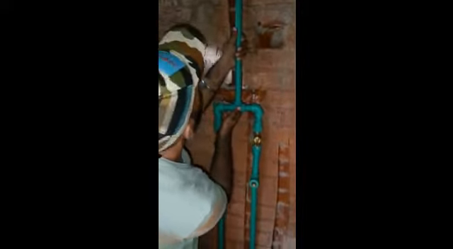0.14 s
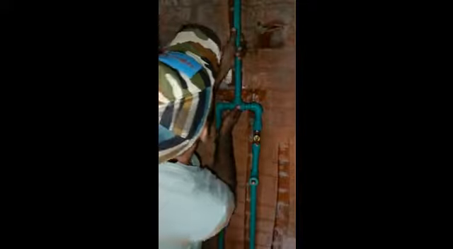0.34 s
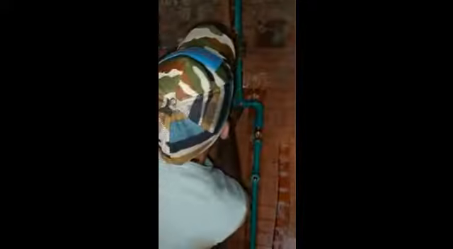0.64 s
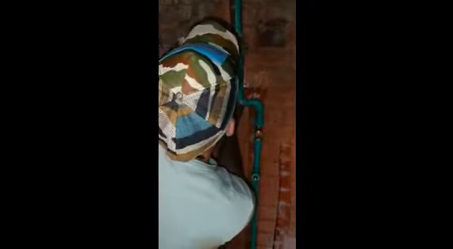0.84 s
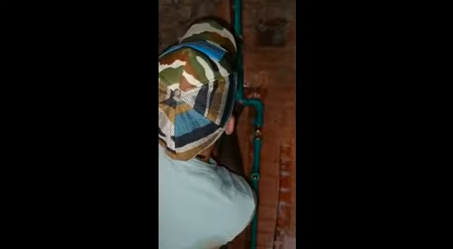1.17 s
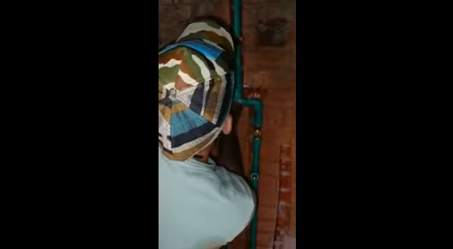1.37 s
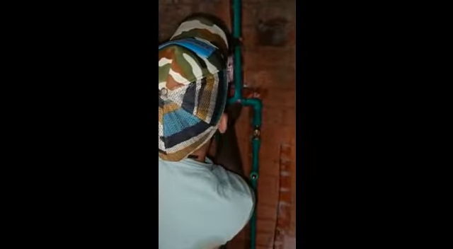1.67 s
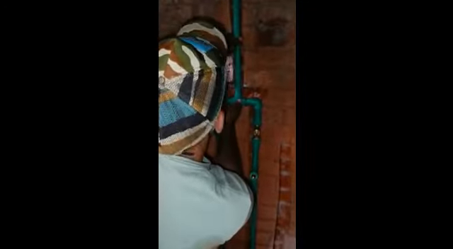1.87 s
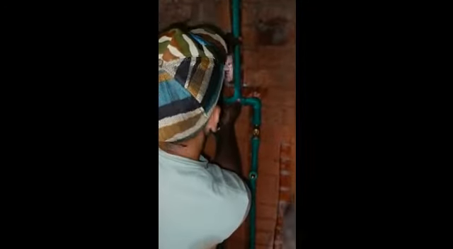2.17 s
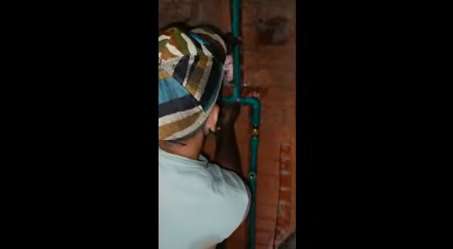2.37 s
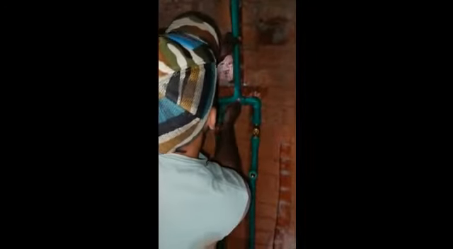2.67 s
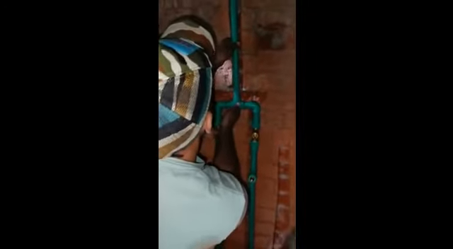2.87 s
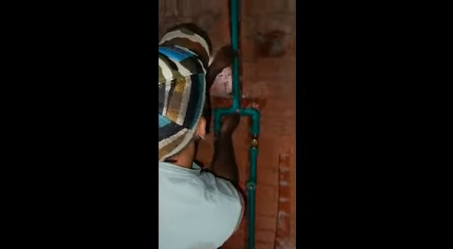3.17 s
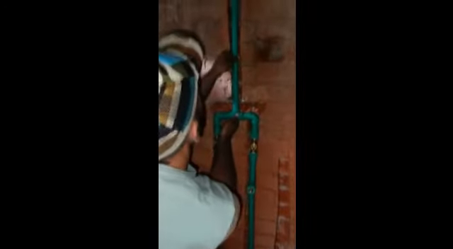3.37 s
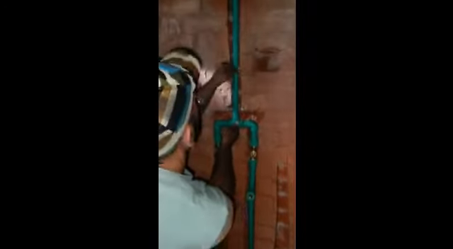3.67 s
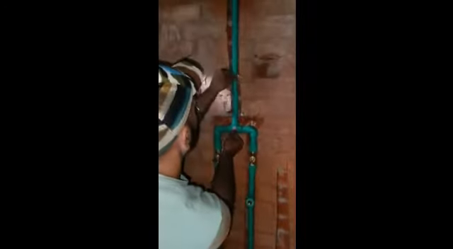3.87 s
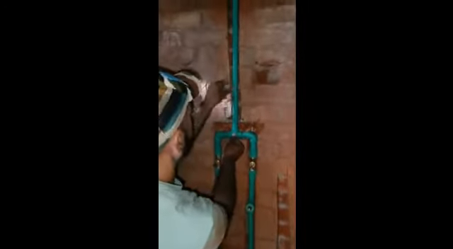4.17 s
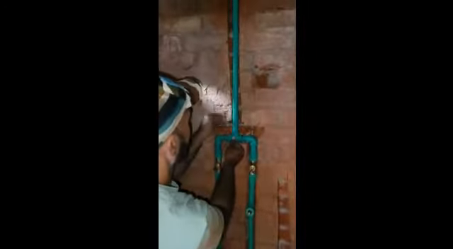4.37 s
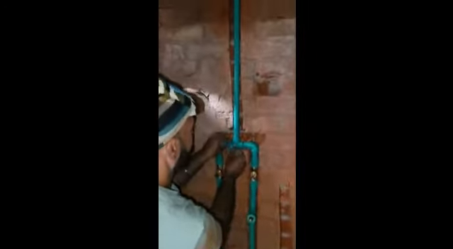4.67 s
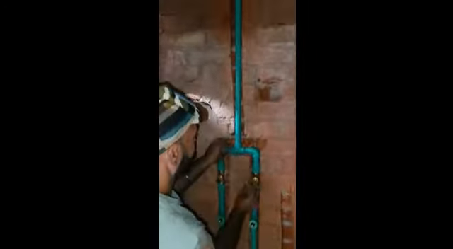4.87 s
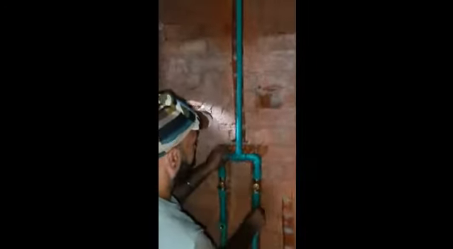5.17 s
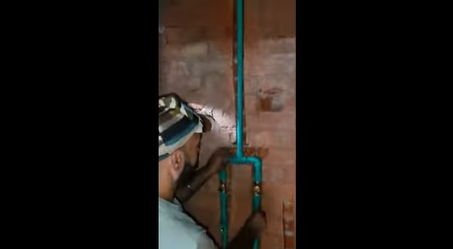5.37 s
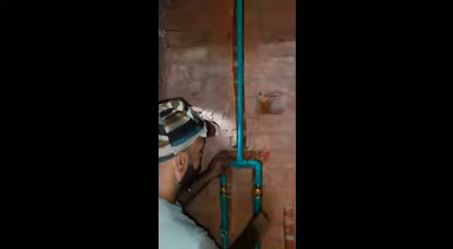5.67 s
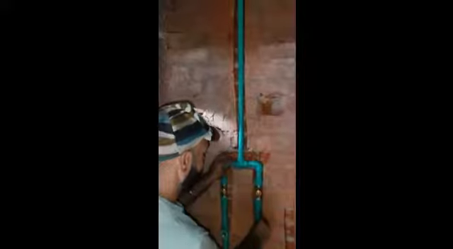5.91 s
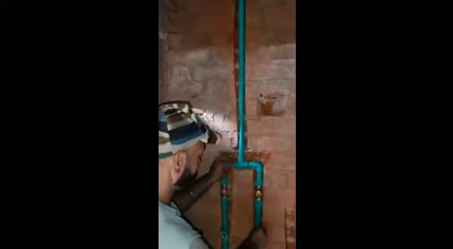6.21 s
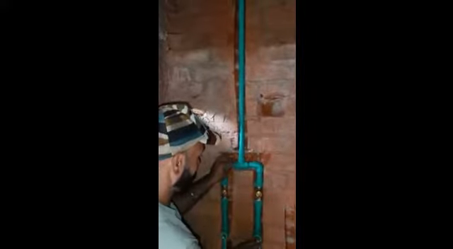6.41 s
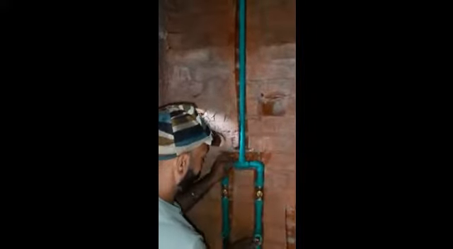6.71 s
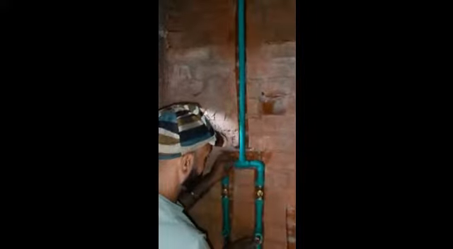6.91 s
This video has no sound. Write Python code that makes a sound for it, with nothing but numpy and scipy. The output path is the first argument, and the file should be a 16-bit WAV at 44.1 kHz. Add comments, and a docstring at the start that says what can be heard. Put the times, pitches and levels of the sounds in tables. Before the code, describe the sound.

Plastic water pipes rub and knock against brick in a small bare room, with a loud hollow clattering clunk, joint groans and thin squeaks.

```python
"""Plastic water pipes are worked by hand against a brick wall in a small bare room, close to a phone.
Room air, rumble and faint hiss lie under the first slides of hand and pipe, made of noise slips.
Grit ticks, fittings knock, tight joints groan, a pipe end grinds, then the pipe run clunks on the wall;
blows mix coloured noise with decaying modes, and groans and squeaks are wavering tones.
Lighter handling follows, with squeaks and more knocks, and a low drone grows at the end."""
import sys
import numpy as np
from scipy import signal
from scipy.fft import rfft, irfft, next_fast_len
from scipy.io import wavfile
from scipy.ndimage import uniform_filter1d

SR = 44100
rng = np.random.default_rng(int(sys.argv[2]) if len(sys.argv) > 2 else 0)


def file_out(sig):
    """Save sig as 16-bit WAV at sys.argv[1]."""
    # one column per channel
    cols = np.atleast_2d(sig).T
    # limit, then scale
    lim = np.clip(cols, -1, 1)
    pcm = np.round(lim * 32767).astype(np.int16)
    wavfile.write(sys.argv[1], SR, pcm)


N = 310923  # length in samples
TIME = np.arange(N) / SR  # seconds into the scene
AGE = np.arange(24576) / SR  # seconds into one blow
ROOM_T60_S = 0.46  # time for the room to die by 60 dB


def undb(db):
    """Decibels to gain."""
    return 10 ** (np.asarray(db) / 20)


def unit(x):
    """Scale to rms 1."""
    return x / np.sqrt(np.mean(x ** 2))


def fade(t60):
    """Exponential decay over the life of one blow, by 60 dB in t60 seconds."""
    return np.exp(-np.log(1000) * AGE / max(t60, .002))


def add(out, start, sound):
    """Mix a sound in at a time in seconds."""
    i = max(int(start * SR), 0)
    out[:, i:i + sound.shape[-1]] += sound[..., :N - i]


def colour(x, points):
    """Filter by a spectrum of (Hz, dB) points, joined along log frequency."""
    hz, db = np.transpose(points)
    size = next_fast_len(x.shape[-1])
    bins_hz = np.arange(size // 2 + 1) * SR / size
    gain = undb(np.interp(np.log(bins_hz + 1), np.log(hz), db))
    return irfft(rfft(x, size) * gain, size)[..., :x.shape[-1]]


def diffuse(count):
    """Noise from all directions at two spaced ports: alike in the bass, unrelated in the treble."""
    port_spacing_m, sound_speed = 0.16, 343  # speed in m/s
    size = next_fast_len(count)
    bins_hz = np.arange(size // 2 + 1) * SR / size
    likeness = np.sinc(2 * port_spacing_m / sound_speed * bins_hz)
    spectra = rfft(rng.standard_normal((2, size))) * np.sqrt([1 + likeness, 1 - likeness])
    mid, side = irfft(spectra, size)[:, :count]
    return unit(np.array([mid + side, mid - side]))


def walk(rate, count=N):
    """Smooth random wander of spread near 1, with a new target rate times a second."""
    hold = int(SR / rate)
    steps = np.repeat(rng.standard_normal(count // hold + 1), hold)
    return unit(uniform_filter1d(steps, hold)[:count])


def push(start, length, rise, release):
    """Effort of one movement: it builds smoothly, holds, and dies away when the hand stops."""
    effort = np.zeros(N)
    span = slice(int(start * SR), int((start + length + release) * SR))
    age = TIME[span] - start
    built = np.sin(np.pi / 2 * np.clip(age / max(rise, .001), 0, 1)) ** 2
    effort[span] = built * np.exp(-np.log(1000) * np.maximum(age - length, 0) / max(release, .001))
    return effort


def near_wall(x):
    """Rough brick scatters the treble back within some 50 ms; the pattern shifts as the hand moves."""
    hand_sweep_hz = 1.7  # cycles of the reflection pattern per second
    scatter = colour(rng.standard_normal((4, len(AGE))), [(600, -25.5), (1800, -2.5)]) * fade(0.043)
    scatter = scatter[:, :2048] / np.sqrt(np.sum(scatter ** 2) / 4)
    here, there = (signal.oaconvolve(x, part, axes=1)[:, :N] for part in np.split(scatter, 2))
    place = 2 * np.pi * hand_sweep_hz * TIME
    return x + undb(6.5) * (np.cos(place) * here + np.sin(place) * there)


def friction(points, rate, spread_db):
    """Many tiny random slips a second, each a brief noise puff, combed by the wall next to it."""
    size_db = spread_db * np.minimum(rng.exponential(size=N), 4)
    energy = (rng.random(N) < rate / SR) * undb(size_db) ** 2
    # each slip dies fast, over a weaker slow tail
    puff = fade(0.0016) ** 2 + undb(-13.0) ** 2 * fade(0.13) ** 2
    grain = np.sqrt(np.abs(signal.oaconvolve(energy, puff)[:N]))
    return unit(colour(near_wall(diffuse(N) * grain), points))


def burst(points, t60, tail_db, rise_s):
    """Coloured noise stands for a blow's dense modes: quick decay, then the room's, ragged by reflections."""
    decay = np.hypot(fade(t60), undb(tail_db) * fade(ROOM_T60_S))
    shape = decay * (1 - np.exp(-AGE / max(rise_s, 1e-5)))
    reflections = undb(2.4 * walk(350, count=len(AGE)) * (1 - fade(.04)))
    sound = colour(diffuse(len(AGE)), points) * shape * reflections
    return unit(sound) * np.sqrt(np.mean(shape ** 2))


def ring(modes):
    """Decaying sine modes, weighted and tuned afresh as each blow lands elsewhere and the grip shifts."""
    hz, db, t60 = np.transpose(modes)[:, :, None]
    detune, weight, lag, phase = rng.standard_normal((4, len(modes), 1))
    # rattling bends the pitch of each mode as it rings
    bend = 0.011 * np.array([walk(60, count=len(AGE)) for _ in modes])
    rattle = np.cumsum(bend, axis=1) / SR
    turns = hz * ((1 + .004 * detune) * AGE + rattle)
    waves = np.exp(2j * np.pi * turns - np.log(1000) / t60 * AGE)
    # opposite phase shifts set the two ports apart
    port_lag = np.array([.5, -.5]) * lag * hz / 450
    gains = undb(db + 2.0 * weight) * np.exp(1j * (np.pi * phase + port_lag))
    return (gains.T @ waves).imag


def room(x, wet_db):
    """Direct sound plus the diffuse ring of the bare walls, as decaying noise that swells in quickly."""
    tail = diffuse(len(AGE)) * fade(ROOM_T60_S) * (1 - fade(0.012))
    tail = tail / np.sqrt(np.sum(tail ** 2) / 2)
    return x + undb(wet_db) * signal.fftconvolve(np.atleast_2d(x), tail, axes=1)[:, :N]


def background():
    """Filtered noise: quiet room air, the rumble of the held phone and a faint low drone that grows."""
    # Spectrum of the room air. Each row: frequency in Hz, level in dB.
    air_colour = [(25, -7), (42, -2.5), (70, -10), (140, -5.5), (250, -17.5), (360, -14.5), (470, -14.5),
                  (650, -22.5), (1400, -22), (2100, -28.5), (3200, -41.5), (6000, -40), (8500, -35.5),
                  (11000, -38), (16000, -44)]
    # The hand-held phone is shifted. Each row: start in seconds, length in seconds, level in dB before trim.
    shifts = [(1.647, 0.41, -50), (4.028, 0.22, -45), (5.067, 0.059, -45), (5.535, .38, -42),
              (6.0, 0.91, -52.5)]
    air = unit(colour(diffuse(N), air_colour)) * undb(-60.5 + 0.72 * walk(2.5))
    rumble_colour = [(15, -21.5), (28, 1), (41, 12.5), (55, 1.0), (80, -16), (160, -47.0)]
    rumble = unit(colour(diffuse(N), rumble_colour))
    drone = unit(colour(diffuse(N), [(120, 6.5), (172, 14.0), (188, 20), (205, 3), (270, -65)]))
    jostle = sum(undb(db) * push(start, length, rise=0.083, release=0.5) for start, length, db in shifts)
    rumble_level = undb(-5.5) * np.hypot(undb(-59), jostle)  # trim times steady and shifting parts
    since = TIME - 5.94  # seconds since the drone came in
    growth = np.clip(since / .1, 0, 1) * undb(-70.5 + 17.5 * since)  # 17.5 dB per second
    return air + rumble * rumble_level + drone * growth


def slides():
    """Hand and pipe slip along brick under uneven pressure: dull rub, grainy rasp, sandy scratch, fine hiss."""
    # A hand slides along pipe and wall. Each row: start in seconds, length in seconds, rise in seconds,
    # dull rub in dB, rasp of the pipe wall in dB, hiss of skin and cloth in dB; rub and hiss before trim.
    strokes = [(0.187, 0.097, 0.045, -61, -63.5, -86), (.45, 0.52, 0.1, -74, -94, -80.5),
               (1.571, 0.24, .2, -40.5, -45.5, -43.5), (1.803, 0.2, 0.19, -41.5, -52.5, -46),
               (1.998, 0.077, .012, -37, -46, -40.5), (2.17, 0.11, 0.048, -53.5, -70, -71),
               (3.581, 0.18, 0.093, -44.5, -58.5, -61), (3.715, 0.16, 0.051, -40, -56.5, -69),
               (3.927, 0.15, 0.06, -41, -36, -70), (4.07, 0.084, 0.036, -45, -40.5, -55),
               (4.188, 0.2, 0.069, -40.5, -54, -60.5), (4.49, 0.08, 0.023, -50, -66.5, -75),
               (4.564, 0.12, 0.046, -49, -63, -65), (4.717, 0.27, 0.061, -54, -67, -70.5),
               (4.96, 0.19, 0.076, -43.5, -54.5, -62), (5.185, 0.44, 0.031, -54, -67, -73.5),
               (5.419, .18, 0.13, -39, -46, -52), (5.66, .24, 0.079, -43, -54, -53),
               (5.942, 0.14, 0.03, -50, -60.5, -67), (6.159, 0.12, 0.047, -52.5, -61, -65),
               (6.422, 0.74, 0.18, -56, -65.5, -100), (6.827, 0.031, 0.035, -53, -58.5, -62),
               (6.916, 0.021, 0.02, -48, -62, -64)]
    # Spectra of the dull rub, pipe-wall rasp, sandy scratch and skin-and-cloth hiss.
    # Each row: frequency in Hz, level in dB.
    rub_colour = [(45, -16.5), (80, -4.5), (140, 0.5), (220, -4.5), (380, -6.5), (700, -18), (1500, -57.5)]
    rasp_colour = [(200, -23.5), (420, -6), (620, 0.5), (1000, 2.5), (1500, 0.5), (2100, -10),
                   (2900, -26.5), (3800, -37), (8000, -52.5)]
    scratch_colour = [(900, 23.5), (1700, 20), (2600, 4), (3600, -35.5), (5500, -0.5), (8000, -11),
                      (16000, -6.5)]
    hiss_colour = [(2500, 0), (4500, -4.5), (6200, -1.5), (8300, 7), (11000, -3.5), (13000, -1.5),
                   (16000, 5)]
    rub, rasp = 0, 0
    hiss = undb(-87 + 4.5 * walk(12))  # sleeves never quite rest
    for start, length, rise, rub_db, rasp_db, hiss_db in strokes:
        rub = np.hypot(rub, undb(rub_db) * push(start, length, rise, release=0.35))
        rasp = np.hypot(rasp, undb(rasp_db) * push(start, length, rise, release=0.24))
        hiss = np.hypot(hiss, undb(hiss_db) * push(start, length, rise, release=0.18))
    pressure = undb(1.5 * walk(49))
    rubbing = undb(-7.0) * rub * friction(rub_colour, rate=200, spread_db=2.0)
    rasping = rasp * friction(rasp_colour, rate=1200, spread_db=1.5)
    scratching = undb(-22) * rasp * friction(scratch_colour, rate=1000, spread_db=12.0)
    hissing = undb(6.5) * hiss * friction(hiss_colour, rate=4400, spread_db=3.0)
    return pressure * (rubbing + rasping + scratching + hissing)


def ticks():
    """Grains of grit break in tiny noise bursts; a joint snaps lightly into its seat."""
    # Grit under the pipe. Each row: start in seconds, level in dB before trim.
    grit_ticks = [(1.3666, -51), (1.493, -44), (2.0098, -33), (3.716, -37.5), (4.065, -37), (4.2396, -51),
                  (4.3726, -41), (4.6837, -41), (5.442, -37), (5.4823, -27), (5.5088, -30), (5.514, -28.5),
                  (5.5567, -39), (5.5687, -27), (5.6098, -28.5), (5.8713, -31), (5.8766, -32), (6.348, -38)]
    # Joint snaps. Each row: start in seconds, level in dB before trim.
    joint_snaps = [(3.457, -33)]
    # Spectrum of breaking grit. Each row: frequency in Hz, level in dB.
    grit_colour = [(1200, -3.5), (3000, -12.5), (5500, -14), (8000, 1), (11000, -12), (16000, 3)]
    snap_colour = [(700, -22), (1300, 9.0), (2000, 1.5), (3200, -40), (8000, -44)]
    out = np.zeros((2, N))
    for s, db in grit_ticks:
        add(out, s, undb(db + 2.5) * burst(grit_colour, t60=0.02, tail_db=-17.0, rise_s=.0001))
    for s, db in joint_snaps:
        add(out, s, undb(db - 2.5) * burst(snap_colour, t60=0.016, tail_db=-46.0, rise_s=0.00097))
    return out


def knocks():
    """Hand-damped fittings give short dry knocks; harder contact adds a bright edge and a crack."""
    # Fittings knock. Each row: start in seconds, then hollow body, clack, hard edge and crack,
    # each in dB before trim.
    blows = [(1.74, -23.5, -54, -41.5, -54), (1.782, -28, -43, -51, -59), (2.08, -25.5, -29.5, -58, -39),
             (2.093, -25.5, -34, -62, -51.5), (4.066, -20, -21, -42, -60), (4.073, -27, -44, -32, -46),
             (4.187, -22, -23.5, -32, -66), (4.194, -32, -24.5, -34, -75), (4.257, -43, -35.5, -48, -66),
             (5.285, -58.5, -56, -57.5, -70), (5.554, -19.5, -27, -57, -42.5),
             (5.569, -27, -34.5, -58, -51), (5.601, -28, -25, -38, -48), (6.021, -42.5, -46.5, -70, -60),
             (6.238, -32, -20, -26, -26), (6.256, -27.5, -21.5, -40, -55),
             (6.328, -23.5, -22.5, -37.5, -50), (6.349, -24.5, -26.5, -64, -53),
             (6.387, -32, -36.5, -65, -65), (6.405, -32.5, -38, -68, -72)]
    # Modes of a gripped fitting. Each row: frequency in Hz, level in dB, time to die by 60 dB in seconds.
    fitting_modes = [(760, -16, 0.063), (942, -1.5, 0.038), (1145, 8, 0.013), (1401, -9, 0.095)]
    # Spectra of body, clack, hard edge and crack. Each row: frequency in Hz, level in dB.
    body_colour = [(50, 1), (120, -3), (240, -2.5), (350, 9.5), (460, -2.5), (600, -34), (1200, -51.5)]
    clack_colour = [(300, -30), (580, -6), (880, 1), (1300, -1), (1650, -23), (2100, -26), (3500, -50)]
    edge_colour = [(800, -24), (1500, 8), (2100, 0), (2600, -10.5), (3300, -42.5), (4500, -45), (8000, -51)]
    crack_colour = [(1500, -10.5), (2800, 11.5), (4000, -5), (6000, 0), (8300, 2.5), (11000, -14.5),
                    (16000, -11.5)]
    out = np.zeros((2, N))
    for s, body_db, clack_db, edge_db, crack_db in blows:
        add(out, s, undb(body_db - 4.5) * burst(body_colour, t60=.11, tail_db=-22.0, rise_s=0.012))
        add(out, s, undb(clack_db + 1.5) * ring(fitting_modes) * (1 - fade(0.012)))
        add(out, s, undb(clack_db - 3.0) * burst(clack_colour, t60=0.1, tail_db=-23.5, rise_s=0.004))
        add(out, s, undb(edge_db + 4) * burst(edge_colour, t60=0.085, tail_db=-20.5, rise_s=0.00017))
        add(out, s, undb(crack_db - 5.0) * burst(crack_colour, t60=0.077, tail_db=-26, rise_s=0.00095))
    return out


def stick_slip(rows, rise, release, jitter, jitter_rate, flutter_db, overtone_db):
    """Grip and release as a gliding sine and its octave, wavering in rate and strength."""
    waver = 1 + jitter * walk(jitter_rate)
    flutter = undb(flutter_db * walk(110))
    out = np.zeros((1, N))
    for start, length, first_hz, last_hz, db in rows:
        span = slice(int(start * SR), int((start + length + release) * SR))
        hz = np.interp(TIME[span], [start, start + length], [first_hz, last_hz])
        phase = 2 * np.pi * np.cumsum(hz * waver[span]) / SR
        wave = (np.sin(phase) + undb(overtone_db) * np.sin(2 * phase)) * flutter[span]
        effort = push(start, length, rise, release)[span]
        add(out, start, undb(db) * unit(wave * effort) * np.sqrt(np.mean(effort ** 2)))
    return out


def joints():
    """Stick-slip in twisted joints groans low and rough, or squeaks thinly, and rings in the room."""
    # A tight joint is twisted. Each row: start in seconds, length in seconds, first slip rate in Hz,
    # last slip rate in Hz, level in dB before trim.
    twists = [(1.75, 0.038, 296, 321, -33), (3.63, 0.11, 275.6, 289, -47.5), (3.715, 0.11, 285, 293.7, -36),
              (3.84, 0.072, 336.6, 317, -40), (3.97, 0.098, 360, 385, -36), (4.12, 0.081, 285, 270, -39),
              (4.21, 0.18, 264, 285.6, -42)]
    # Plastic squeaks on plastic. Each row: start in seconds, length in seconds, first pitch in Hz,
    # last pitch in Hz, level in dB before trim.
    squeaks = [(4.13, 0.016, 7200, 6820, -42.5), (4.9, 0.075, 1480, 1480, -66.5),
               (4.975, 0.039, 1510, 1530, -49.5), (5.012, 0.036, 1536, 1520, -43),
               (5.052, .066, 1526, 1514, -43.5), (5.12, 0.036, 1536, 1500, -56),
               (6.71, 0.046, 1560, 1580, -63.5)]
    groan = stick_slip(twists, rise=.03, release=0.082, jitter=0.087, jitter_rate=130,
                       flutter_db=4.5, overtone_db=-16.5)
    squeak = stick_slip(squeaks, rise=0.019, release=0.052, jitter=0.0055, jitter_rate=160,
                        flutter_db=2.0, overtone_db=-32.5)
    return room(undb(-3.5) * groan + undb(-2.0) * squeak, wet_db=-10.5)


def grind():
    """Plastic chatters on plastic in many small slips: a bright rasp that dies away after each turn."""
    # A pipe end grinds round in its socket. Each row: start in seconds, length in seconds, level in dB.
    turns = [(1.997, 0.019, -36.5), (3.961, 0.058, -43.5)]
    # Spectrum of the grind. Each row: frequency in Hz, level in dB.
    grind_colour = [(1100, -23), (1500, 4.5), (1900, 5), (2400, -5.5), (3100, -6), (3600, -24.5),
                    (6000, -32.5)]
    effort = sum(undb(db) * push(start, length, rise=0.017, release=0.37) for start, length, db in turns)
    return effort * friction(grind_colour, rate=770, spread_db=1.0)


def clunks():
    """The long pipe slaps the brick and rattles: a crack, a clack of its shell, a hollow ring and a thud."""
    # The pipe run hits the wall. Each row: start in seconds, then hollow ring, clack, crack and wall thud,
    # each in dB before trim.
    hits = [(2.445, -30, -12.5, -19, -48), (2.4488, -7.5, -8.5, -18.5, -22), (2.487, -13, -21, -34, -20),
            (2.522, -13, -22, -44, -33), (2.598, -21.5, -16.5, -41.5, -33.5), (2.674, -6.5, -16, -49, -26),
            (2.71, -25.5, -45, -57, -29.5), (2.8, -11, -27, -33.5, -37), (2.804, -7.5, -17, -43, -32.5),
            (2.842, -9, -23.5, -56, -31), (2.856, -18.5, -38, -53, -37), (2.867, -18.5, -25.5, -40, -35),
            (2.877, -27, -43, -65, -39)]
    # The pipe drags a little just before it hits. Each row: start in seconds, level in dB before trim.
    drags = [(2.662, -17), (2.792, -18)]
    # Modes of the pipe run, then higher modes of its shell.
    # Each row: frequency in Hz, level in dB, time to die by 60 dB in seconds.
    pipe_modes = [(301, -14, .25), (335, -11, .25), (366, -11, .3), (435, 2, .38), (465, -11, .22),
                  (497, -6, .38), (562, -5, .42), (590, -9, .28), (625, -9, .2), (1030, -20, .25),
                  (1140, -19, .3), (1453, -19, .25), (1570, -19, .2)]
    shell_modes = [(820, -11, 1), (1110, -2.5, 0.37), (1215, -0.5, .5), (1278, -4.5, 0.17),
                   (1360, -3, 0.32), (1440, -9, 0.17), (1750, -4.5, 0.2), (1940, -6, 0.36),
                   (1880, -10.5, 0.28), (2082, -8, 0.3), (2190, -0.5, 0.19), (2700, -7, 0.23),
                   (2600, -8.5, 0.41), (2890, -15.5, 0.63), (3240, -20, 0.5), (3390, -11.5, 0.24)]
    # Spectra of hollow ring, clack, crack and wall thud. Each row: frequency in Hz, level in dB.
    hollow_colour = [(150, -31), (270, -31), (350, 2), (450, 2.5), (620, 3), (740, -15), (1000, -41)]
    clack_colour = [(450, -47), (750, -10), (1250, 4.5), (1900, -0.5), (2700, -17.5), (3600, -38),
                    (6000, -24.5)]
    crack_colour = [(1500, -15), (2400, 6), (3000, 7.5), (4000, 1.5), (6000, -1), (8300, 6), (11000, -6.5),
                    (16000, -6)]
    thud_colour = [(22, -39.5), (40, 1.5), (60, 3.5), (100, -4.5), (145, 1), (195, 1), (280, -10.5),
                   (600, -53.5)]
    port_db = np.array([[-2.0], [1.0]])  # the ring leans to the right port
    out = np.zeros((2, N))
    for s, ring_db, clack_db, crack_db, thud_db in hits:
        add(out, s, undb(ring_db - 12.5 + port_db) * ring(pipe_modes) * (1 - fade(0.04)))
        add(out, s, undb(ring_db - 5) * burst(hollow_colour, t60=0.1, tail_db=-14.5, rise_s=0.0029))
        add(out, s, undb(clack_db - 5.0) * burst(clack_colour, t60=0.071, tail_db=-14.0, rise_s=0.00075))
        add(out, s, undb(crack_db - 1.5) * burst(crack_colour, t60=0.09, tail_db=-14.5, rise_s=0.0016))
        # hard blows wake the shell
        add(out, s, undb(crack_db - 11) * ring(shell_modes) * (1 - fade(.03)))
        add(out, s, undb(thud_db - 3.0) * burst(thud_colour, t60=0.057, tail_db=-3.5, rise_s=0.0072))
    for s, db in drags:
        add(out, s, undb(db + 8.5) * burst(hollow_colour, t60=0.12, tail_db=-18, rise_s=0.019))
        add(out, s, undb(db) * burst(crack_colour, t60=0.11, tail_db=-44, rise_s=0.046))
    return out


def scene():
    """All the handling over the quiet room."""
    return background() + slides() + ticks() + knocks() + joints() + grind() + clunks()


def record(dry):
    """Each port adds its own treble notch; the phone clips at full scale and cuts the top."""
    # Colour of the left and right microphone ports. Each row: frequency in Hz, level in dB.
    left_port = [(300, 4), (3500, 3.5), (5500, 1.5), (6700, -17.5), (8000, -1), (9600, 2.5), (12000, -6.5),
                 (15500, -17.5)]
    right_port = [(300, 5), (3500, 5), (5500, 4), (7000, 3.5), (8600, 1), (10200, -21.5), (12000, -0.5),
                  (15500, -3.5)]
    top_hz = 16000
    heard = np.clip([colour(dry[0], left_port), colour(dry[1], right_port)], -1, 1)
    return signal.sosfilt(signal.ellip(10, .2, 80, top_hz, fs=SR, output="sos"), heard)


dry = scene()
out = record(dry)
file_out(out)
```